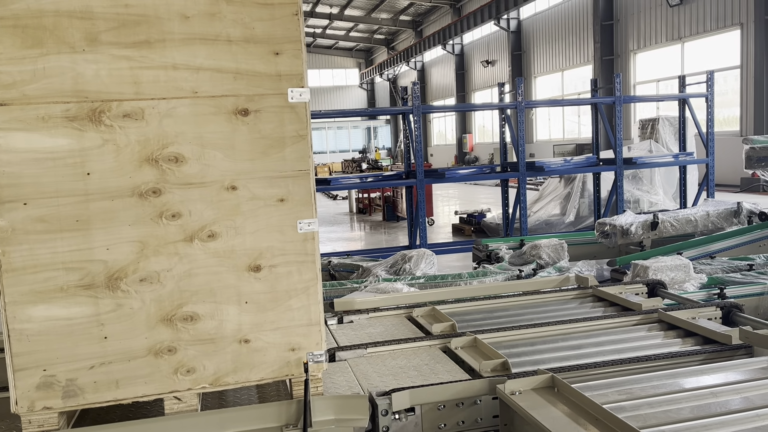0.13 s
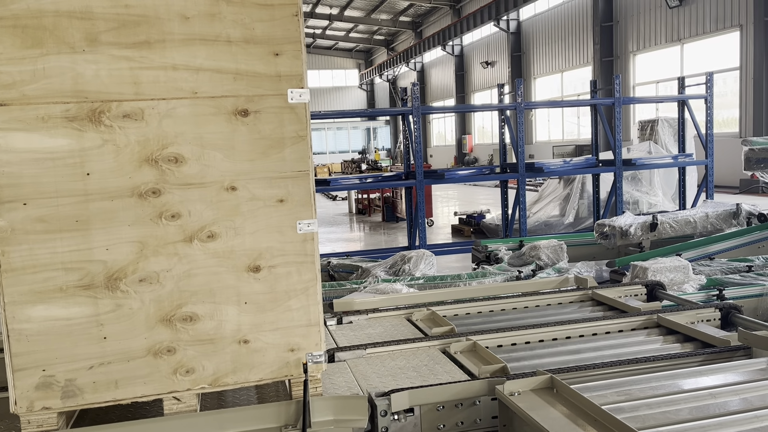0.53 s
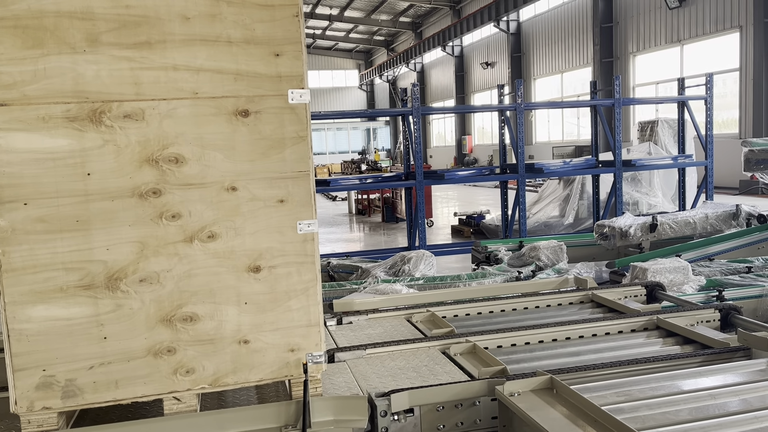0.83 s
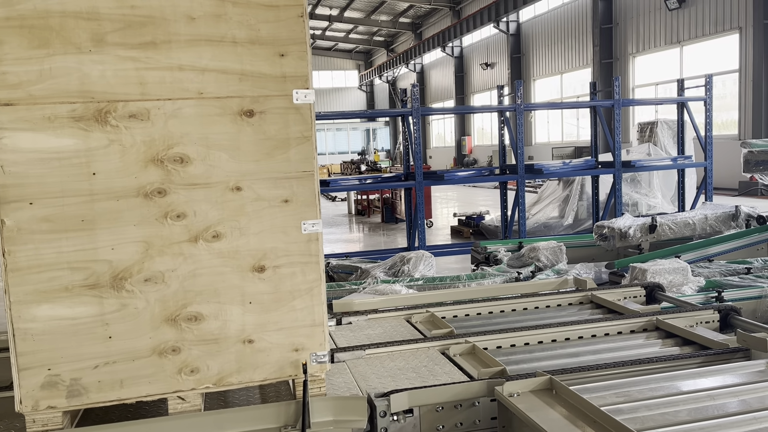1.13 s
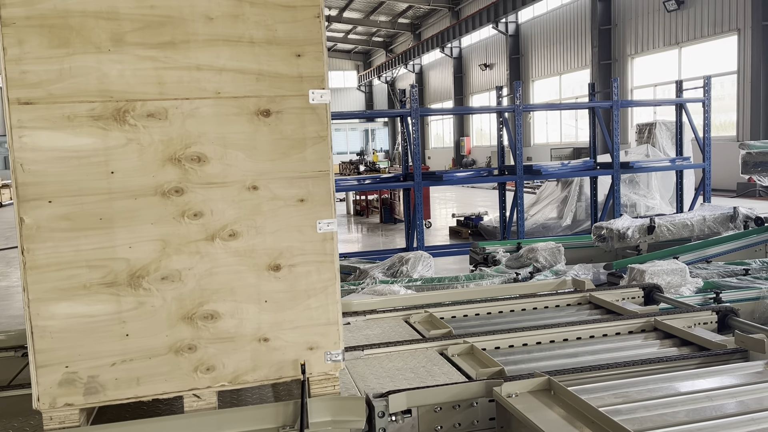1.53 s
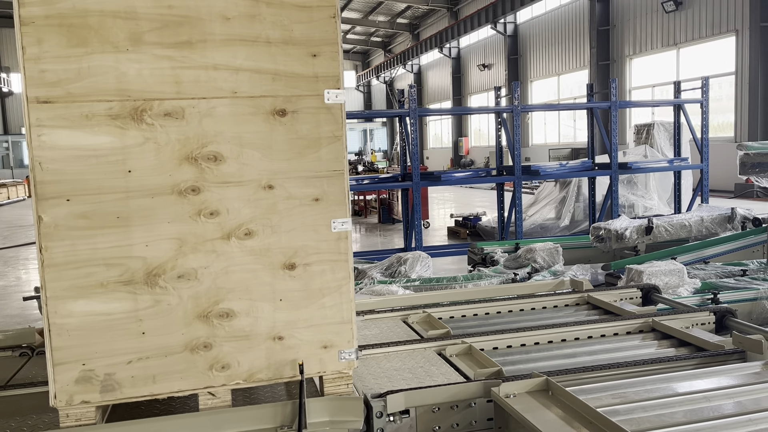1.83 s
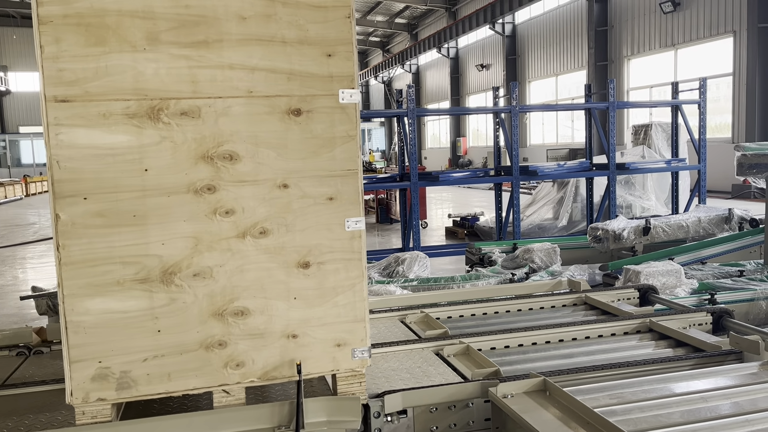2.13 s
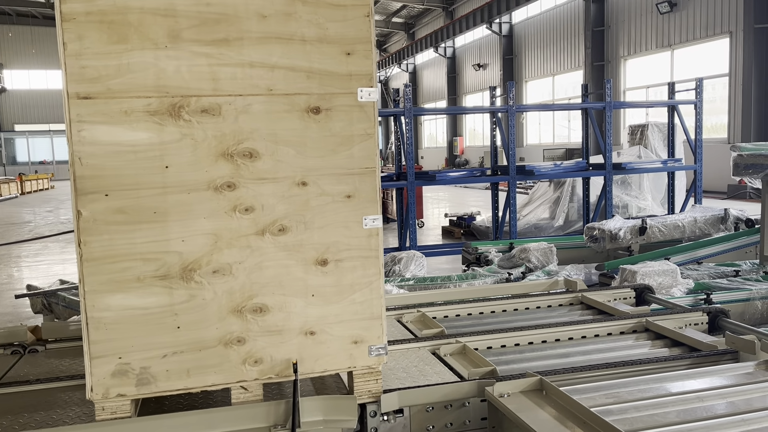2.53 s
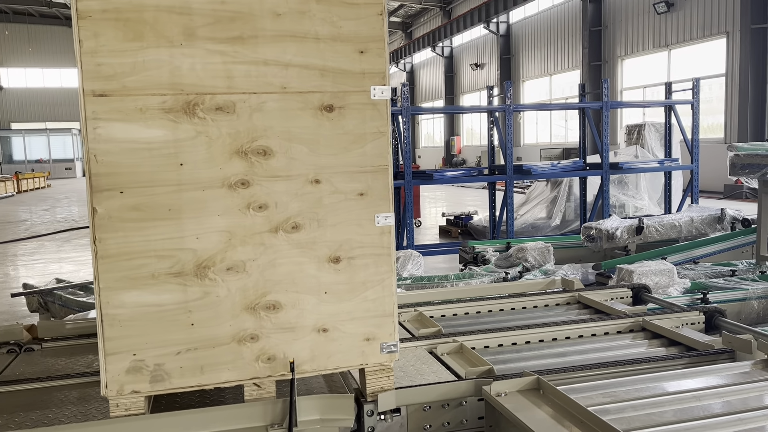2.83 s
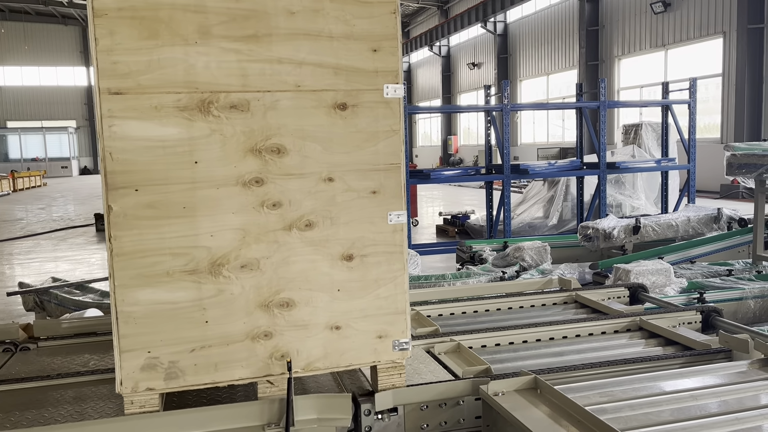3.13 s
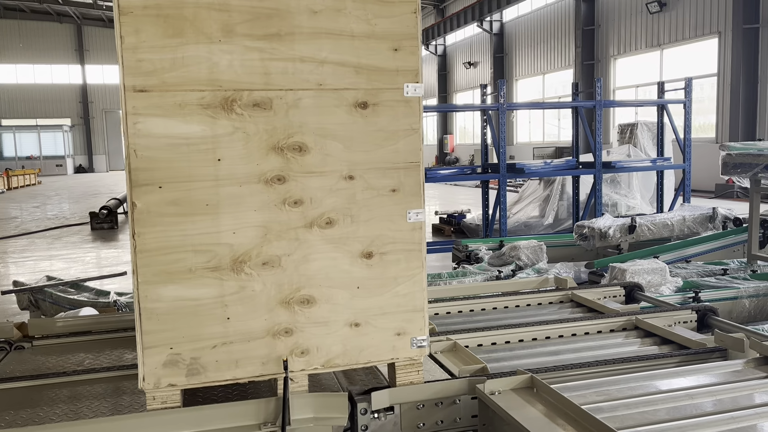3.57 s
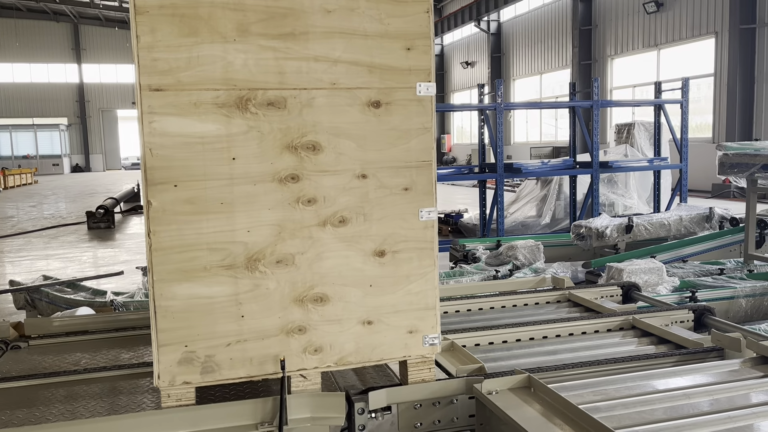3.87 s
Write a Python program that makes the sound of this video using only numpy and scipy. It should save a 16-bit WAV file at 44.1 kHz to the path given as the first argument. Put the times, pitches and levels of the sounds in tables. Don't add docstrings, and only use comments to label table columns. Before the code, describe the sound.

Conveyor motor whines up to speed, then a heavy crate knocks repeatedly across rollers in a hall

```python
import sys
import numpy as np
from scipy import signal
from scipy.fft import rfft, irfft, next_fast_len
from scipy.io import wavfile

SR = 44100
rng = np.random.default_rng(int(sys.argv[2]) if len(sys.argv) > 2 else 0)


def waveform_to_disk(signal):
    frames = np.transpose(np.atleast_2d(signal))
    scaled = np.clip(frames, -1, 1) * 32767
    samples = np.round(scaled).astype(np.int16)
    wavfile.write(sys.argv[1], SR, samples)


def gain_from_db(level_db):
    decades = np.asarray(level_db, float) / 20
    return 10 ** decades


N = 176400

# t/s, peak/dB, then thump/dB, clack/dB, bright/dB relative to the body colour
ROLLER_KNOCKS = [(1.117, -12, -4.5, -7, -11.5), (1.436, -10.5, -6, -6.5, -9.5),
                 (1.661, -7, -10, -12.5, -18.5), (1.868, -5, -12, -12.5, -16), (2.073, -6, -8, -9.5, -14),
                 (2.266, -12.5, -8.5, -9.5, -49), (2.502, -17, -18, -10, -13.5),
                 (2.679, -19.5, -8.5, -69.5, -50), (2.911, -9, -10, -10, -20.5),
                 (3.128, -6, -13.5, -13.5, -15.5), (3.306, -7.5, -31.5, -11, -11),
                 (3.538, -7, -8, -9.5, -10.5), (3.754, -8, -8.5, -13, -11),
                 (3.969, -7.5, -6.5, -11.5, -12.5)]
ATTACK_S = 0.003406
START_S, RAMP_HZ_PER_S, FULL_HZ = 0.71, 55, 48.7


def rms_one(x):
    return x / np.sqrt(np.mean(x ** 2) + 1e-20)


def at_hz(points, hz):
    table = np.array(points)
    return np.interp(np.log(hz), np.log(table[:, 0]), table[:, 1])


def drift(rate_hz):
    r = np.exp(-80 * np.pi * rate_hz / SR)
    white = rng.standard_normal(N // 40 + 2002)
    slow = signal.lfilter([1], [1, -2 * r, r * r], white)[2000:]
    return np.interp(np.arange(N) / 40, np.arange(len(slow)), rms_one(slow))


def fade(x, seconds):
    r = np.exp(-1 / (max(seconds, 1e-5) * SR))
    return signal.lfilter([1 - r], [1, -r], x + 1e-18)


def resonate(x, hz, width_hz):
    r = np.exp(-np.pi * width_hz / SR)
    poles = [1, -2 * r * np.cos(2 * np.pi * hz / SR), r * r]
    return signal.lfilter([1 - r * r, 0, r * r - 1], poles, x + 1e-18)


def resonate_twice(x, hz, width_hz):
    return resonate(resonate(x, hz, width_hz), hz, width_hz)


def bands():
    edges_hz = 22 * 2 ** np.arange(0, 9.7, 1 / 3)
    return [(np.sqrt(a * b), signal.butter(2, [a, b], "band", fs=SR, output="sos"))
            for a, b in zip(edges_hz, edges_hz[1:])]


def banded_noise(spectrum, patchy_db, rate_hz):
    together = drift(0.39)
    white = rng.standard_normal((2, 2, N))
    out = np.zeros((2, N))
    for k, (hz, sos) in enumerate(bands()):
        level_db = at_hz(spectrum, hz) + patchy_db * (0.5 * together + drift(rate_hz))
        out += gain_from_db(level_db) * signal.sosfilt(sos, white[k % 2])
    return rms_one(out)


def hum(hz, width_hz, db):
    return gain_from_db(db) * rms_one(resonate_twice(rng.standard_normal((2, N)), hz, width_hz))


def far_machines():
    # f/Hz, density/(dB per Hz)
    hall_noise = [(15, -57), (40, 0.5), (118, -1), (158, -6), (786, -15.5), (4230, -35), (8250, -44.5),
                  (9190, -39.5), (15600, -50)]
    # f/Hz, width/Hz, level/dB
    far_hums = [(122.3, 6.2, -50.5), (395, 5, -60), (809, 33, -56), (867, 10, -62), (1230, 4.1, -60)]
    noise = gain_from_db(-39.5) * banded_noise(hall_noise, patchy_db=1.0, rate_hz=8.1)
    return noise + sum(hum(*row) for row in far_hums)


def hall_echoes(x):
    t60_s, cut_hz, wet_db = 2.33, 8300, -15
    t = np.arange(int(1.5 * SR)) / SR
    tail = rng.standard_normal((2, len(t))) * gain_from_db(-60 * t / t60_s) * np.clip(t / 0.023, 0, 1)
    tail = fade(tail, 1 / (2 * np.pi * cut_hz))
    tail /= np.sqrt(np.sum(tail ** 2) / 2)
    return gain_from_db(wet_db) * signal.fftconvolve(x[None], tail, axes=1)[:, :N]


def supply_hz():
    return np.clip(RAMP_HZ_PER_S * (np.arange(N) / SR - START_S), 0, FULL_HZ)


def links():
    taps_per_s, level_db, ring_cycles = 900, -49, 30
    tapped = rng.random(N) < taps_per_s * gain_from_db(4 * drift(7)) / SR
    sizes = gain_from_db(2 * np.minimum(rng.exponential(1, N), 2)) * tapped
    dealt = rng.integers(0, 16, N)
    taps = sizes * rng.standard_normal((2, N))
    out = np.zeros((2, N))
    for k, hz in enumerate(np.geomspace(1300, 5500, 16)):
        out += resonate(taps * (dealt == k), hz, hz / ring_cycles) * (1500 / hz) ** 2.7
    return gain_from_db(level_db) * rms_one(out)


def chain():
    # f/Hz, density/(dB per Hz)
    rumble_colour = [(21, -37), (35, 0), (173, -3), (1120, -14.5), (1450, -14.5), (6280, -35.5),
                     (8090, -24), (12800, -42), (14900, -38)]
    hum_hz = [160, 373, 872, 295, 1250, 54, 5300, 10100, 12600]
    # width/Hz, level/dB, unsteadiness/dB
    hum_rows = [(14, -39.5, 1.5), (6, -42, 1.0), (3, -47.5, 1), (14, -49, 1.5), (30, -52, 1.5),
                (12, -45, 1.2), (150, -65, 3), (200, -69, 3), (300, -71, 3)]
    drive = (supply_hz() / FULL_HZ) ** 1.57
    throb = gain_from_db(0.84 * drift(0.77))
    out = gain_from_db(-36.5) * banded_noise(rumble_colour, patchy_db=5.0, rate_hz=15.6)
    for hz, (width_hz, db, sway_db) in zip(hum_hz, hum_rows):
        out += gain_from_db(sway_db * drift(19)) * hum(hz, width_hz, db)
    return drive * (out + throb * links())


def whine():
    # start/s, end/s, carrier/Hz, level/dB
    stages = [
        (.78, .865, 8000, -8),
        (.85, 1.065, 10667, -7),
        (1.045, 4.1, 8000, 0),
    ]
    orders = [-19, -13, -5, -3.08, -1, 1, 5, 7, 10, 13, 19]
    # run-up level/dB, level at speed/dB
    order_levels = [(-66, -62), (-64, -60), (-57, -67), (-66, -56), (-56, -49), (-54, -50), (-58, -68),
                    (-60, -72), (-70, -64), (-54, -67), (-68, -65)]
    whine_db, waver_db, buzz_db, buzz_hz, buzz_width_hz = -2, 1.2, -53, 7450, 800
    t, f = np.arange(N) / SR, supply_hz()
    turns = np.cumsum(f) / SR
    settled = (f / FULL_HZ) ** 4
    tones = np.zeros(N)
    for start, end, carrier_hz, stage_db in stages:
        gate = gain_from_db(stage_db + whine_db) * fade(fade((t > start) * (t < end), 0.0038), 0.0039)
        for order, (early_db, late_db) in zip(orders, order_levels):
            level = gain_from_db(early_db + (late_db - early_db) * settled + waver_db * drift(4.1))
            phase = carrier_hz * t + order * turns + rng.random()
            tones += gate * level * np.sin(2 * np.pi * phase)
    buzz = gain_from_db(buzz_db) * rms_one(resonate_twice(rng.standard_normal(N), buzz_hz, buzz_width_hz))
    out = np.sqrt(2) * tones + gate * buzz * (1 - 0.75 * settled)
    return np.array([out, 0 * out])


def ticks():
    # t/s, peak/dB, centre f/Hz, length/s
    tick_rows = [(0.785, -62.5, 3570, 0.19), (.785, -63, 5900, 0.28), (2.699, -35, 1300, 0.036),
                 (2.701, -44, 3600, 0.025), (2.755, -49, 3000, 0.02), (3.40, -46, 2700, 0.03),
                 (3.79, -42, 2700, 0.03), (2.856, -50, 5000, 0.01), (1.385, -60, 10100, 0.03),
                 (3.087, -51, 10800, 0.0072), (3.40, -35.5, 1300, 0.026), (3.51, -38, 2340, .015),
                 (3.851, -38, 4000, 0.0087)]
    out, t = np.zeros((2, N)), np.arange(N) / SR
    for s, db, hz, length_s in tick_rows:
        burst = rng.standard_normal((2, N)) * (t > s) * np.exp(-np.maximum(t - s, 0) / length_s)
        out += gain_from_db(db) * resonate_twice(burst, hz, 0.37 * hz) * np.sqrt(SR / hz / 2)
    return out


def snaps():
    # t/s, peak/dB
    snap_rows = [(1.114, -37), (1.435, -27.5), (1.661, -33.5), (1.867, -28.5), (2.0746, -31.5),
                 (2.8846, -33), (2.9093, -38), (3.127, -37), (3.307, -29.5), (3.539, -25.5), (3.755, -33),
                 (3.9695, -30.5), (1.5763, -54), (2.2663, -46), (2.6384, -45), (2.6868, -46), (2.853, -44),
                 (3.2276, -50), (3.6466, -52), (3.8272, -53)]
    length_s, low_hz = 0.007, 5500
    t, shape = np.arange(N) / SR, np.zeros(N)
    for s, db in snap_rows:
        shape += gain_from_db(db) * (t > s - 0.002) * np.exp(-np.maximum(t - s, 0) / length_s)
    treble = signal.butter(2, low_hz, "high", fs=SR, output="sos")
    return signal.sosfilt(treble, shape * rng.standard_normal((2, N)))


def strikes():
    # f/Hz, width/Hz, level/dB, length/s
    strike_rows = [(773, 200, -6.5, 0.0087), (1500, 360, -26.5, 0.0086), (3930, 2500, -23, 0.018),
                   (2600, 1070, -21.5, 0.039)]
    bright_from_hz, bright_share = 3000, 1.28
    s, db, _, _, bright_db = np.transpose(ROLLER_KNOCKS)
    extra_db = bright_share * (bright_db - bright_db.mean())
    luck = rng.standard_normal((len(s), len(strike_rows)))
    out = np.zeros((2, N))
    for k, (hz, width_hz, level_db, length_s) in enumerate(strike_rows):
        clicks = np.zeros(N)
        first = ((s - ATTACK_S) * SR).astype(int)
        clicks[first] = gain_from_db(db + level_db + 0.5 * luck[:, k] + (hz > bright_from_hz) * extra_db)
        shape = fade(fade(clicks, length_s) * length_s * SR, 0.0041)
        noise = shape * rng.standard_normal((2, N))
        out += resonate(noise, hz, width_hz) * np.sqrt(SR / width_hz / 6)
    return out


def contacts():
    # t/s, peak/dB, panel f/Hz
    contact_rows = [(1.121, -18, 1680), (1.141, -7, 1340), (1.149, -16, 374), (1.166, -12, 1270),
                    (1.44, -9.5, 466), (1.454, -9.5, 1450), (1.464, -22, 315), (1.483, -21, 330),
                    (1.662, -16, 755), (1.677, -28, 682), (1.691, -25, 310), (1.7, -29, 380),
                    (1.871, -5.5, 1690), (1.885, -14, 1460), (1.895, -8, 350), (1.915, -24, 580),
                    (2.074, -10, 1018), (2.088, -14, 646), (2.096, -12.0, 332), (2.109, -12, 328),
                    (2.268, -9, 363), (2.28, -26, 367), (2.3, -19.5, 370), (2.314, -24.5, 1390),
                    (2.499, -18.5, 380), (2.511, -14, 316), (2.526, -24, 310), (2.554, -19.5, 251),
                    (2.678, -15, 734), (2.69, -15, 700), (2.704, -14.5, 305), (2.714, -33, 275),
                    (2.912, -11.5, 734), (2.93, -14, 370), (2.941, -16, 350), (2.951, -22, 303),
                    (3.131, -5, 970), (3.149, -15.5, 252), (3.157, -7.5, 349), (3.169, -16, 390),
                    (3.306, -14.5, 1380), (3.319, -4.5, 1328), (3.331, -7, 365), (3.348, -31, 367),
                    (3.543, -4, 1395), (3.555, -9, 1425), (3.573, -19, 340), (3.588, -8, 1307),
                    (3.755, -23, 750), (3.766, -16, 645), (3.782, -7, 392), (3.793, -23, 650),
                    (3.971, -3.5, 920), (3.982, -18, 660)]
    gain_db, t60_at_700_hz_s, rise_s, side_share = -5, 0.05, 0.0012, 0.3
    out, t = np.zeros((2, N + SR)), np.arange(SR // 4) / SR
    luck = rng.random((len(contact_rows), 3))
    for (s, db, hz), (detune, phase, place) in zip(contact_rows, luck):
        t60_s = t60_at_700_hz_s * (700 / hz) ** 0.85
        shape = gain_from_db(db + gain_db - 60 * t / t60_s) * (1 - np.exp(-t / rise_s))
        panel = np.sin(2 * np.pi * hz * t)
        neighbour = np.sin(2 * np.pi * (hz * (0.8 + 0.4 * detune) * t + phase))
        side = side_share * (2 * place - 1) * neighbour
        first = int(s * SR)
        out[:, first:first + len(t)] += shape * np.array([panel + 0.92 * neighbour, side])
    return out[:, :N]


def knocks():
    zones_hz = [280, 800, 1500, 3500]
    # f/Hz, density/(dB per Hz)
    body_colour = [(59, -60), (100, -12.5), (390, -3.5), (1180, -9), (1400, -6), (2100, -16), (4600, -29.5),
                   (12100, -56), (14900, -53)]
    # f/Hz, t60/s
    crate_t60 = [(120, 0.99), (350, 0.32), (1000, 0.35), (3000, 0.24), (6000, 0.37), (12000, 0.082)]
    # f/Hz, level/dB, t60/s
    mode_rows = [(190.7, -4, 0.61), (365.8, -4, 0.36), (449.8, -7, 0.21), (527, -11.5, 0.52),
                 (644, -7, 0.47), (928.4, -7, 0.7), (970.6, -10, 0.32), (1306, -8.5, 0.54),
                 (1377, -6.5, 0.33), (1447.4, -4.5, 0.71), (1683, -11, 0.62), (2598, -14.5, 0.47)]
    rattle_s, grain_db, late_s, late_hz = 0.023, 2.6, 0.0072, 350
    knock_db, mode_db, mode_damping = -9, -32, 3.0
    push_db, rattle_share = 48.5, 0.71
    s, db, low, clack, bright = np.transpose(ROLLER_KNOCKS)
    zones_db = np.array([low - low.mean(), 0 * s, clack - clack.mean(), bright - bright.mean()])
    grains = gain_from_db(grain_db * np.minimum(rng.exponential(1, (2, 2, N)), 4))
    rattle = rms_one(grains * rng.standard_normal((2, 2, N)))
    luck, out = rng.standard_normal((len(s), 60)), np.zeros((2, N))

    def envelope(hz, extra_db, t60_s):
        colour_db = np.array([at_hz(np.transpose([zones_hz, z]), hz) for z in zones_db.T])
        shape = np.zeros(N)
        for start, gain in zip(s, gain_from_db(db + colour_db + extra_db)):
            first = int((start - ATTACK_S) * SR)
            t = np.arange(min(N - first, SR // 2)) / SR
            shape[first:first + len(t)] += gain * gain_from_db(-60 * np.maximum(t - rattle_s, 0) / t60_s)
        return fade(shape, ATTACK_S / 2 + late_s / (1 + (hz / late_hz) ** 2))

    for k, (hz, sos) in enumerate(bands()[6:]):
        shape = envelope(hz, knock_db + at_hz(body_colour, hz) + luck[:, k], at_hz(crate_t60, hz))
        out += signal.sosfilt(sos, rattle[k % 2] * shape) * gain_from_db(12.5)
    for k, (hz, level_db, t60_s) in enumerate(mode_rows):
        shape = envelope(hz, mode_db + level_db + luck[:, 30 + k], 0.091)
        drive = rattle_share * rattle[k % 2] * shape
        push = np.maximum(np.diff(shape, prepend=0), 0)
        drive[0] += (-1) ** k * gain_from_db(push_db) * push
        width_hz = np.log(1000) / np.pi / t60_s * mode_damping
        out += resonate(drive, hz, width_hz) * gain_from_db(40.0)
    return out


def ports(pair, alike):
    # f/Hz, phase lead/rad
    lead_rad = [(60, 0), (1600, .7), (4500, .8), (6500, -1.1), (8000, -2.55), (9400, -3.6), (11100, -6.3),
                (15500, -9.4)]
    # f/Hz, level difference/dB
    tilt_db = [(60, 0), (600, 0), (800, 1.5), (1300, -1.5), (2300, 3), (4300, 5), (7800, 1), (14400, 0)]
    size = next_fast_len(N + 4096)
    hz = np.maximum(np.fft.rfftfreq(size, 1 / SR), 10)
    c = np.clip(at_hz(alike, hz), -1, 1)
    mid, side = rfft(pair, size) * np.sqrt([(1 + c) / 2, (1 - c) / 2])
    turn = gain_from_db(at_hz(tilt_db, hz) / 2) * np.exp(0.5j * at_hz(lead_rad, hz))
    return irfft([(mid + side) * turn, (mid - side) / turn], size)[:, :N]


def scene():
    # f/Hz, correlation
    near_alike = [(60, .998), (300, .985), (700, .92), (1400, .65), (4000, .72), (8000, .98), (9400, .97),
                  (12000, .85), (15000, .96)]
    # f/Hz, correlation
    far_alike = [(60, .995), (180, .96), (540, .62), (1600, .4), (4800, .5), (7800, .96), (9300, .96),
                 (12500, .7), (15000, .96)]
    body_cut = signal.butter(4, 4700, fs=SR, output="sos")
    body = signal.sosfilt(body_cut, knocks() + strikes() + contacts())
    far = far_machines() + hall_echoes(body[0])
    near = chain() + whine() + ticks() + snaps() + body
    return ports(far, far_alike) + ports(near, near_alike)


def band_limit(x):
    return signal.sosfilt(signal.butter(12, 15800, fs=SR, output="sos"), x)


def record(dry):
    x = signal.sosfilt(signal.butter(4, 44, "high", fs=SR, output="sos"), dry)
    x = 1.6 * np.tanh(x / 1.9)
    x = signal.sosfilt(signal.cheby2(10, 50, 16100, fs=SR, output="sos"), x)
    return band_limit(x)


dry = scene()
out = record(dry)
waveform_to_disk(out)
```